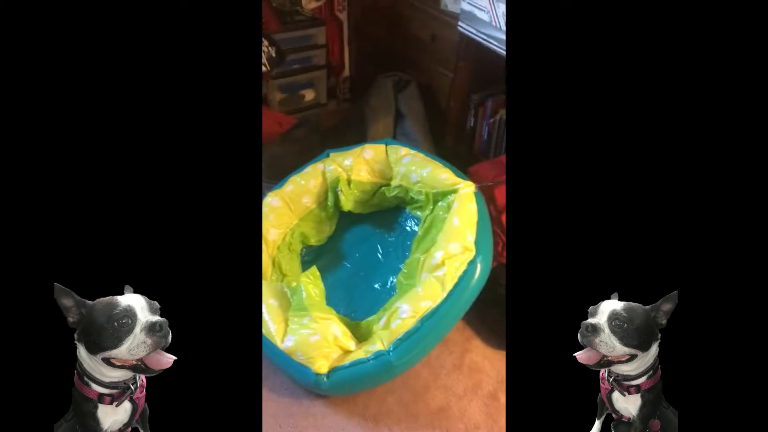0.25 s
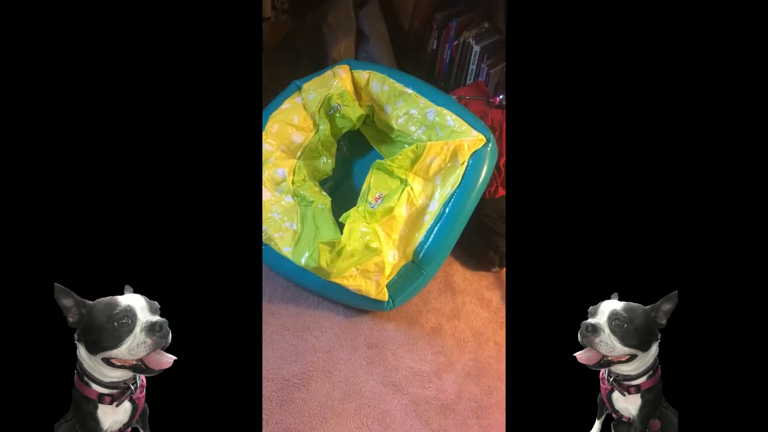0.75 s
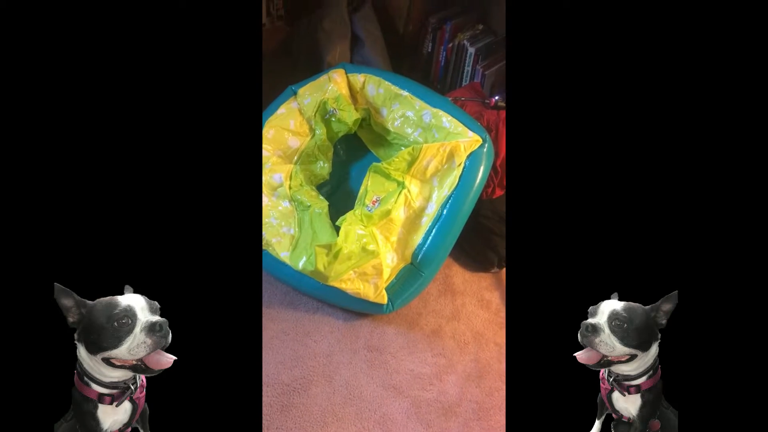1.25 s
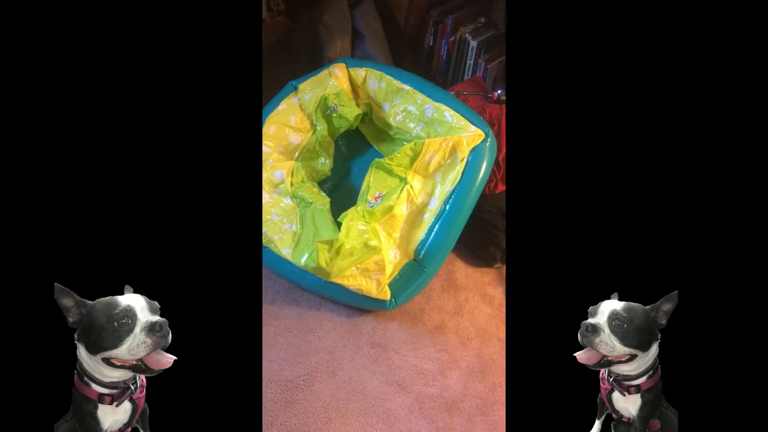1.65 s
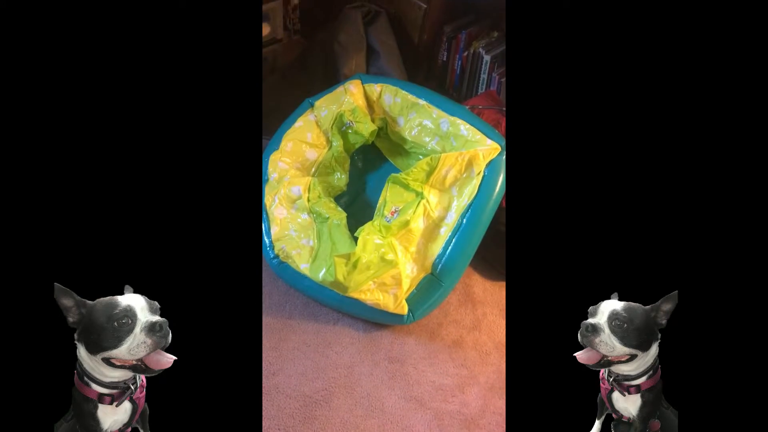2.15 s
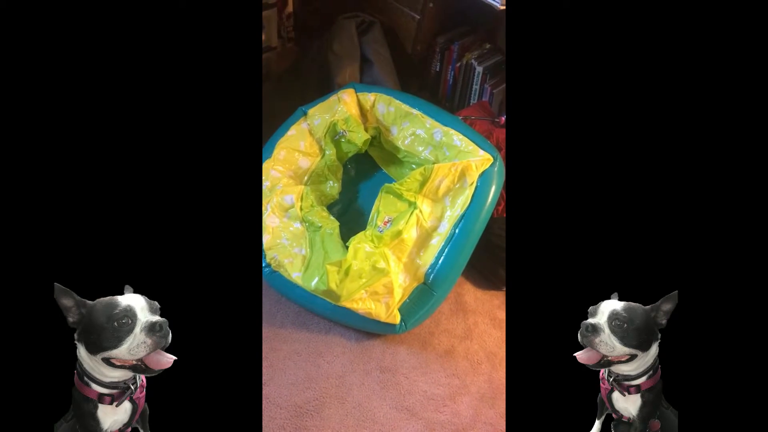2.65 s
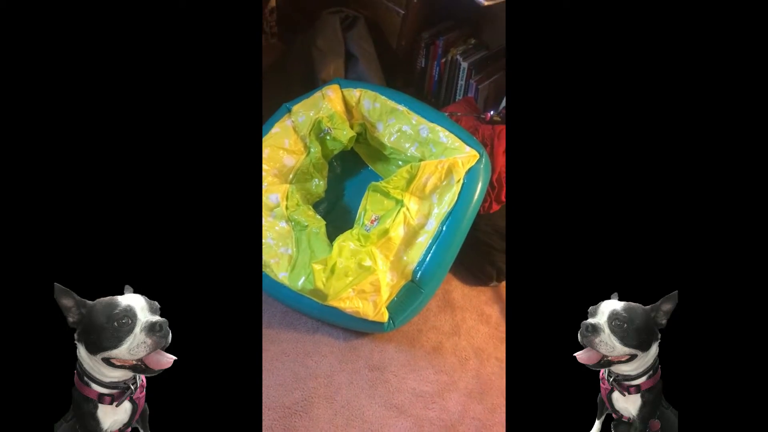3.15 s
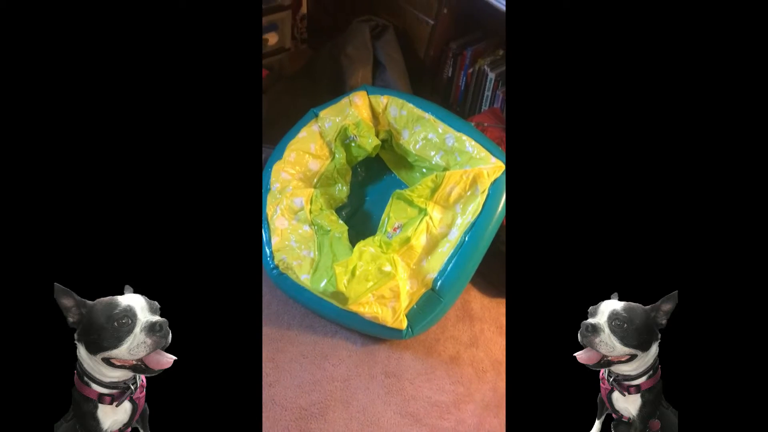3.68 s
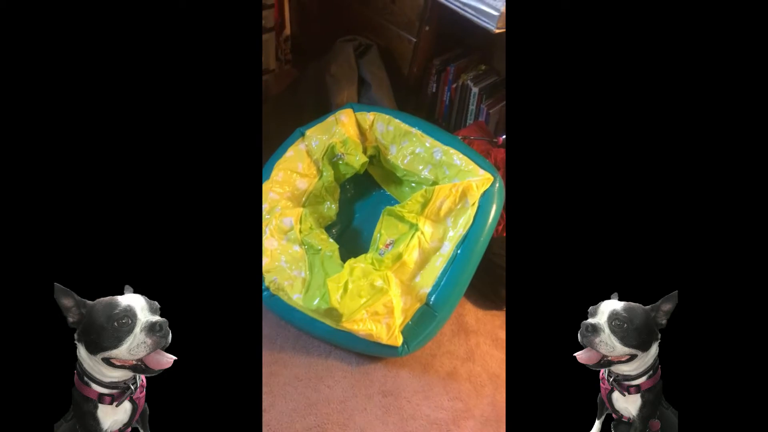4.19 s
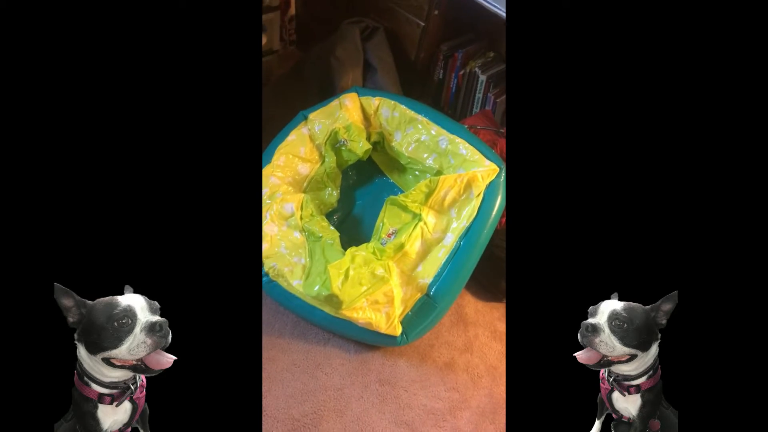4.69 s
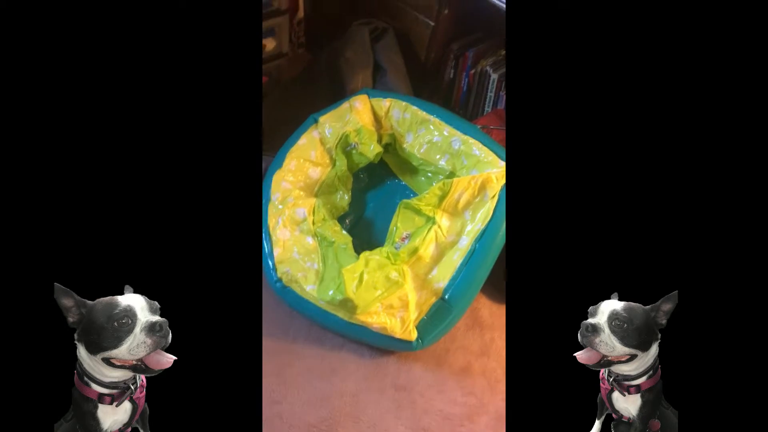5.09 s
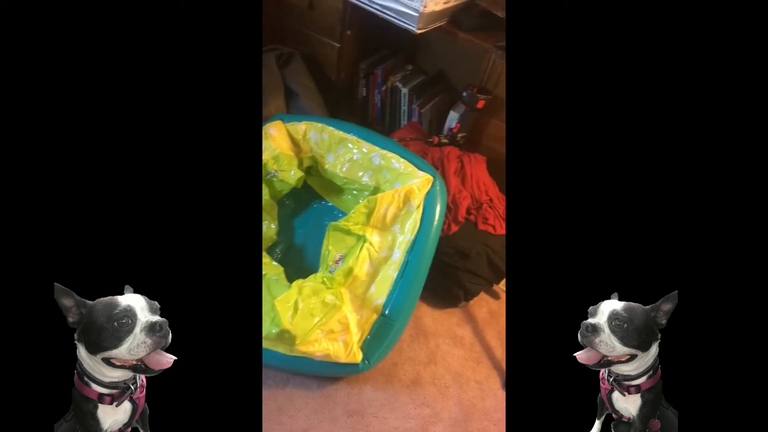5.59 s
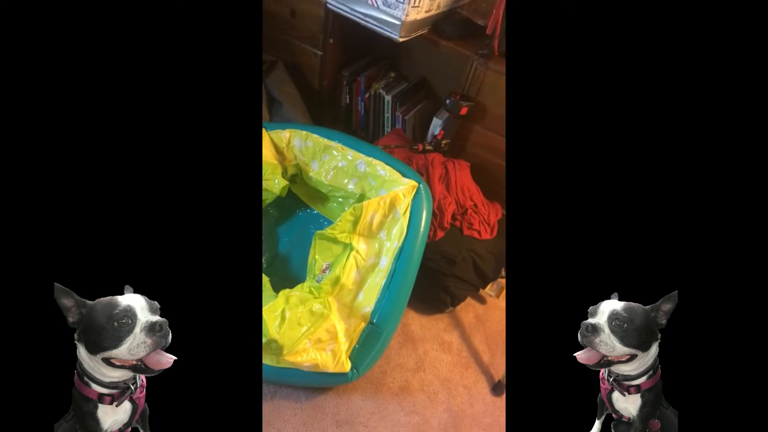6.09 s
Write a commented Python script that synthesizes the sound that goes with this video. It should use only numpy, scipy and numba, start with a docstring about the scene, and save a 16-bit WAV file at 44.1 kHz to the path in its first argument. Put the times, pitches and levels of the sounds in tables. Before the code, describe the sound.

After a fading throbbing whine and a heavy bump, a small pump rattles and hisses in a carpeted room until it shuts off and winds down.

```python
"""A carpeted room, with a small electric piston pump droning and a hand-held phone as the microphone.
First a rough whine of noise-shaken resonances dies away, and decaying modes knock the phone hard.
After a short silence the pump fades up: summed crank orders, a clatter replayed every turn and
valve hiss, until it coasts to a stop. Close on the microphone the hand rumbles as low shaped noise,
with bumps, raps and nail ticks as struck modes; faint room tone lies behind."""
import sys
import numpy as np
from scipy import signal
from scipy.fft import rfft, irfft
from scipy.io import wavfile
from scipy.ndimage import uniform_filter1d
from numba import njit

SR = 44100
rng = np.random.default_rng(int(sys.argv[2]) if len(sys.argv) > 2 else 0)


def ratio_of_db(decibels):
    """Turn decibels (scalar or array-like) into linear amplitude factors; 0 dB maps to 1."""
    return 10 ** (np.asarray(decibels, float) / 20)


def unload_wav(signal):
    """Save mono or channel-first audio to the path in sys.argv[1] as 16-bit WAV at rate SR, clipped to [-1, 1]."""
    wavfile.write(
        sys.argv[1],
        SR,
        np.round(np.clip(np.atleast_2d(signal).T, -1, 1) * 32767).astype(np.int16),
    )


N = 279373
T = np.arange(N) / SR  # time in seconds

# Crank harmonics of the pump. Each row: multiple of crank speed, level in dB.
CRANK_ORDERS = [(6, -17), (7, -12), (8, -8.5), (9, -16), (10, -3), (11, -9), (12, -4), (13, -8), (14, -3.5),
                (15, 3.5), (16, 0), (17, -0.5), (18, -11.5), (19, -1), (20, 2), (21, 3), (22, 4),
                (23, -0.5), (24, -2), (25, -2), (26, -22), (27, -4), (28, -34), (29, -16), (30, -3.5),
                (31, -25), (32, -16), (33, -11), (35, -40), (36, -6), (37, -20.5), (38, -22.5), (39, -8),
                (40, -11), (42, -21), (43, -35), (44, -41), (45, -12.5), (46, -25), (47, -37), (48, -23),
                (49, -26), (50, -26), (51, -20), (52, -37), (53, -52), (54, -20.5)]
# Wavering motor tones that sink as the pump coasts. Each row: frequency in Hz, level in dB relative to the pump.
MOTOR_TONES = [(250.6, -26.5), (3338, -30), (4183, -39), (4710, -57), (5173, -44), (6000, -42)]
# Spectrum of the loose clatter. Each row: frequency in Hz, density in dB per Hz.
CLATTER_SPECTRUM = [(120, -44), (200, -19.5), (238, -30), (419, -19), (475, -8), (525, -15), (580, -18),
                    (794, -1.5), (935, -0.5), (1190, 0), (1790, -8.5), (2360, -8), (4000, -39.5),
                    (5200, -48.5), (8800, -120)]
# Spectrum of the valve hiss. Each row: frequency in Hz, density in dB per Hz.
HISS_SPECTRUM = [(1470, -16.5), (2500, -4.5), (2890, -7.5), (3390, -5.5), (3630, -10), (4430, -17),
                 (5240, -14.5), (6390, -20), (8470, -20.5), (9720, -25), (10400, -30), (13900, -30),
                 (15500, -39)]
# Resonances of the pump housing. Each row: frequency in Hz, width in Hz, level in dB.
HOUSING_MODES = [(594, 70, -7), (840, 100, -8), (1000, 60, 0), (1180, 70, 1), (1930, 200, -10),
                 (2400, 200, -10)]
# Brief level changes of the pump, at a tap and on the last slow strokes. Each row: time in seconds, change in dB.
STROKE_SURGES = [(5.471, 4), (5.915, 3), (5.99, 8.5), (6.058, 1.5), (6.09, -2)]
# Overlapping parts of one hard knock.
# Each row: start in seconds, thud level in dB, thud frequency in Hz, case ring in dB, nail tick in dB.
KNOCK_PARTS = [(.469, -4, 116, -20.5, -49), (0.4775, 8.5, 82, -1.5, -14.5), (0.4908, -1, 69, -1, -35),
               (.501, -12, 111, -13.5, -36), (.509, -7.5, 61.8, -24, -58)]
# Soft bumps on the phone. Each row: start in seconds, level in dB, frequency in Hz, 60 dB decay in seconds.
SOFT_BUMPS = [(.636, -22.5, 93.3, .09), (1.82, -15.5, 82, 0.069), (1.897, -16, 61, 0.1),
              (2.077, -10.5, 77.4, 0.047), (2.19, -21, 110, 0.11), (2.54, -27, 109, 0.059),
              (2.931, -29, 88, .14), (3.471, -3, 91.5, 0.037), (3.647, -8.5, 87.2, 0.055),
              (3.941, -17.5, 64, 0.11), (4.272, -20, 98, 0.063), (5.1, -23, 60.7, 0.088),
              (5.288, -23, 57, .15), (5.592, -14.5, 69.6, 0.11), (5.949, -19, 63.3, 0.18),
              (5.829, -31, 70, .12), (6.068, -20.5, 70, .13), (6.16, -27, 100, 0.072),
              (6.268, -23, 59, 0.1)]
# Fingertip raps that ring the case. Each row: start in seconds, level in dB.
FINGER_RAPS = [(.444, -40), (0.547, -47), (.607, -46), (.636, -37.5), (1.249, -30), (1.482, -33),
               (1.82, -31.5), (2.54, -33), (3.62, -26.5), (3.94, -33.5), (5.466, -25.5)]
# Nail ticks. Each row: start in seconds, level in dB.
NAIL_TICKS = [(.607, -49), (.636, -42), (5.466, -12.5), (6.109, -32), (6.201, -47)]
# Modes of the phone body. Each row: frequency in Hz, level in dB, 60 dB decay in seconds.
CASE_MODES = [(333, 11, 0.0094), (444, -11.5, 0.056)]
# Modes of a nail on the case. Each row: frequency in Hz, level in dB, 60 dB decay in seconds.
NAIL_MODES = [(1010, -17, 0.025), (1680, 2.5, 0.0084), (2900, -10, 0.0066), (6200, -18, 0.0055),
              (11000, -35, .004)]
# Hand on the phone between bumps. Each row: time in seconds, rumble level in dB.
GRIP_LEVEL = [(0, -34.5), (.25, -35.5), (.43, -24), (.58, -42), (.8, -54), (1.18, -37), (1.6, -43),
              (2.4, -39.5), (3.5, -38), (4.8, -40.5), (5.4, -33), (5.74, -43), (5.97, -29), (6.12, -41),
              (6.33, -41.5)]
# Spectrum of the hand rumble. Each row: frequency in Hz, density in dB per Hz.
RUMBLE_SPECTRUM = [(12, -53), (20, -26), (48, 16), (80, 6.5), (106, 3.5), (130, -1), (245, -18.5),
                   (283, -15), (300, -37.5), (390, -38), (660, -120)]
# Dying whine, before its throb. Each row: time in seconds, level in dB.
WHINE_FALL = [(0.0, -29), (.17, -34.5), (.24, -37.5), (.29, -49.5), (.35, -63), (.44, -93)]
# Resonances of the whine. Each row: frequency in Hz, width in Hz, level in dB.
WHINE_MODES = [(607.6, 18, -1), (1226, 12, -6), (1670, 21, -28), (1850, 21, -21), (2340, 170, -66),
               (3050, 82, -20)]
# Spectrum of the air rush under the whine. Each row: frequency in Hz, density in dB per Hz.
RUSH_SPECTRUM = [(150, -69), (250, -18), (457, -26), (603, 11.5), (692, -9), (1200, -7), (1450, -19.5),
                 (2400, -19.5), (2800, -30), (3060, -33), (5000, -43), (15500, -64)]
# Spectrum of the room tone. Each row: frequency in Hz, density in dB per Hz.
ROOM_SPECTRUM = [(120, -27), (200, -17), (327, 1.5), (488, -2.5), (618, 1), (1330, -1.5), (2510, -18.5),
                 (13600, -29.5), (14700, -29), (15500, -40)]

SILENCE_START_S, SILENCE_END_S = .645, .692
OFF_S, STOP_S = 5.74, 6.246  # power cut and standstill
COAST_S = .25  # time in which the coasting crank loses 63 % of its speed
CRANK_HZ, CRANK_WANDER = 53, 0.0012085  # driven speed, and its slow wander as a share
PUMP_DB, HISS_DB, CREEP_DB_PER_S = -23, -43.5, 0.035  # at the power cut; the pump works harder as the pool fills
FADE_END_S, FADE_DB_PER_S, HISS_FADE_DB_PER_S = 1.234, 18.5, 21  # pump and hiss fade up
HOSE_HZ, HOSE_WIDTH_HZ, HOSE_GAIN_DB = 1075, 120, 8  # gain from start to power cut, as the pool pushes back


def level(x, db=0):
    """Scale a sound to an rms level in dB."""
    return x * ratio_of_db(db) / np.sqrt(np.mean(x ** 2))


def curve(table):
    """Level over time from (seconds, dB) rows, one value a sample."""
    s, db = np.transpose(table)
    return np.interp(T, s, db)


def colour(x, points):
    """Shape a spectrum by (Hz, dB) points on a log frequency axis, rms 1."""
    hz, db = np.transpose(points)
    log_hz = np.log(np.fft.rfftfreq(N, 1 / SR) + 1)
    return level(irfft(rfft(x) * ratio_of_db(np.interp(log_hz, np.log(hz), db)), N))


def walk(rate):
    """Smoothed random values, about rate a second, rms 1."""
    step = 64  # samples between points
    k = max(int(SR / rate / step), 1)
    held = np.repeat(rng.standard_normal(N // (k * step) + 2), k)
    slow = uniform_filter1d(uniform_filter1d(held, k), k)
    return level(np.interp(np.arange(N) / step, np.arange(len(slow)), slow))


def ring(hz, t60):
    """One exponentially decaying mode, .3 s long."""
    t = T[:int(.3 * SR)]
    return np.sin(2 * np.pi * hz * t) * np.exp(-np.log(1000) * t / t60)


def resonate(noise, peaks):
    """Noise through (Hz, width, dB) resonances, each applied twice for steep skirts."""
    out = 0
    for hz, width_hz, db in peaks:
        b, a = signal.iirpeak(hz, hz / (1.54 * width_hz), SR)
        once = signal.lfilter(b, a, noise)
        out = out + ratio_of_db(db) * level(signal.lfilter(b, a, once))
    return out


def add(out, s, sound):
    """Mix a sound in at time s."""
    i = int(s * SR)
    out[i:i + len(sound)] += sound


@njit
def each_turn(fresh, lag, share):
    """Every turn replays a share of the last turn and adds new chance."""
    y = np.zeros(len(fresh))
    for i in range(len(fresh)):
        back = i - lag[i]
        k = int(back)
        old = 0.
        if back > 0:
            old = y[k] + (back - k) * (y[k + 1] - y[k])
        y[i] = share[i] * old + np.sqrt(1 - share[i] ** 2) * fresh[i]
    return y


def pump():
    """Crank, clatter, hiss and motor, fading up and then coasting to a stop after the power cut."""
    speed = np.exp(-np.clip(T - OFF_S, 0, None) / COAST_S)
    hz = CRANK_HZ * (1 + CRANK_WANDER * walk(2)) * np.maximum(speed, .1)
    turn = 2 * np.pi * np.cumsum(hz) / SR
    stroke = np.cos(turn) + 0.2 * np.cos(2 * turn)
    # a slowing crank no longer repeats itself: the tones die and rough housing noise takes over
    share = speed ** 3.0

    # after the power cut the levels go as a power of the time still to run
    early_s = np.clip(FADE_END_S - T, 0, None)
    left_db = 20 * np.log10(np.clip((STOP_S - T) / (STOP_S - OFF_S), 1e-3, 1))
    surge_db = sum(db * np.exp(-((T - s) / 0.011) ** 2) for s, db in STROKE_SURGES)
    creep_db = CREEP_DB_PER_S * (T - OFF_S)
    pump_db = PUMP_DB + creep_db - FADE_DB_PER_S * early_s + 2.2 * left_db + surge_db
    hiss_db = HISS_DB - HISS_FADE_DB_PER_S * early_s + 2.6 * left_db + surge_db

    # strokes swell the clatter noise, by a smaller share when coasting
    depth = .25 * share + 0.06 * (1 - share)
    fresh = rng.standard_normal(N) * (1 + depth * stroke)
    loose = clatter(fresh, hz, share)
    driven = level(level(crank_orders(turn, hz)) + ratio_of_db(-2.0) * loose) + motor_tones(speed)
    coasting = level(loose + level(resonate(fresh, HOUSING_MODES), -1))
    body = share * driven + np.sqrt(1 - share ** 2) * coasting
    hiss = valve_hiss(stroke, hz, share, hiss_db)
    return (body * ratio_of_db(pump_db) + hiss) * (T > SILENCE_END_S)


def crank_orders(turn, hz):
    """Harmonics of the crank, partly in step, so each turn carries a knock smeared over a few ms."""
    start = 1.2 * rng.standard_normal(len(CRANK_ORDERS))
    # phase lag in rad per order squared around order 20: the knock tightens as the pool fills
    smear = np.interp(T, [SILENCE_END_S, OFF_S], (.17, .02))
    fill_db = HOSE_GAIN_DB * (T / OFF_S - .5)
    out = 0
    for (order, db), phase in zip(CRANK_ORDERS, start):
        near_hose = np.exp(-((order * hz[N // 2] - HOSE_HZ) / HOSE_WIDTH_HZ) ** 2)
        # the hand moves in the room, so each order swells and drifts alone
        order_db = db + near_hose * fill_db - 0.5 * walk(3.6)
        angle = order * turn + phase - smear * (order - 20) ** 2 + 0.27 * walk(7)
        out = out + ratio_of_db(order_db) * np.sin(angle)
    return out


def clatter(fresh, hz, share):
    """Loose parts: stroke-swelled noise, partly repeated one crank turn later."""
    return colour(each_turn(fresh, SR / hz, np.clip(.3 * share, 0, .95)), CLATTER_SPECTRUM)


def valve_hiss(stroke, hz, share, hiss_db):
    """Air through the valves: noise that swells slightly with the stroke and partly repeats each turn."""
    puff = rng.standard_normal(N) * (1 + 0.074 * stroke)
    repeated = each_turn(puff, SR / hz, np.clip(0.19 * share, 0, .95))
    return colour(repeated, HISS_SPECTRUM) * ratio_of_db(hiss_db + 0.42 * walk(13))


def motor_tones(speed):
    """Wavering motor tones whose pitch falls with the coasting speed."""
    motor_s = np.cumsum(speed) / SR
    out = 0
    for hz, db in MOTOR_TONES:
        out = out + ratio_of_db(db + 0.91 * walk(4.5)) * np.sin(2 * np.pi * hz * motor_s + .5 * walk(6.2))
    return out


def whine():
    """Narrow resonances shaken by chance, over a broad rush of air, throbbing as they die away."""
    fall_db = curve(WHINE_FALL)
    throb = np.cos(2 * np.pi * 17.2 * (T - 0.1675))  # Hz, and seconds to a peak
    whine_db = fall_db + 3 * throb
    # the treble falls faster than the whine
    treble_db = 1.17 * fall_db + 2.5 + 1.5 * throb
    tones = resonate(rng.standard_normal(N), WHINE_MODES) * ratio_of_db(1.5 * walk(40))
    rush = colour(rng.standard_normal(N), RUSH_SPECTRUM) * ratio_of_db(1.5 * walk(30))
    dull = signal.sosfilt(signal.butter(4, 1500, fs=SR, output="sos"), rush)
    bright = signal.sosfilt(signal.butter(4, 1500, "high", fs=SR, output="sos"), rush)
    rush = level(dull) * ratio_of_db(whine_db + 2.5) + level(bright) * ratio_of_db(treble_db)
    fade_out = np.clip((.5 - T) / 0.082, 0, 1)
    return (tones * ratio_of_db(whine_db) + rush) * fade_out


def struck(x, push_s):
    """A softer contact is a longer push, which rounds off the ring."""
    push = np.hanning(int(push_s * SR) + 3) ** 2
    return np.convolve(x, push / push.sum())[:len(x)]


def thumps():
    """The knock swings the phone low, rings its case and ticks; lighter touches do one or more of these."""
    thud_push_s, case_push_s, tick_push_s = 0.0068, 0.002, 0.00022
    out = np.zeros(N + SR)
    case = struck(sum(ratio_of_db(db) * ring(hz, t60) for hz, db, t60 in CASE_MODES), case_push_s)
    tick = struck(sum(ratio_of_db(db) * ring(hz, t60) for hz, db, t60 in NAIL_MODES), tick_push_s)
    for s, db, hz, case_db, tick_db in KNOCK_PARTS:
        thud = struck(ring(hz, 5.5 / hz), thud_push_s)  # 5.5 swings until 60 dB down
        add(out, s, ratio_of_db(db) * thud + ratio_of_db(case_db) * case + ratio_of_db(tick_db) * tick)
    for s, db, hz, t60 in SOFT_BUMPS:
        add(out, s, ratio_of_db(db) * struck(ring(hz, t60), thud_push_s))
    for s, db in FINGER_RAPS:
        add(out, s, ratio_of_db(db) * case)
    for s, db in NAIL_TICKS:
        add(out, s, ratio_of_db(db) * tick)
    return out[:N]


def hand():
    """Skin and grip shifting on the phone: a lumpy low rumble that swells after each soft bump."""
    lumps_db = 2.5 * walk(18)
    shifts = 0
    for s, db, hz, t60 in SOFT_BUMPS:
        since = np.clip(T - s, 0, None) / 0.024  # the grip's swell tops after 24 ms
        shifts = shifts + ratio_of_db(db - 19) * since * np.exp(1 - since)
    rumble = colour(rng.standard_normal(N), RUMBLE_SPECTRUM)
    return rumble * (ratio_of_db(curve(GRIP_LEVEL)) + shifts) * ratio_of_db(lumps_db)


def room_tone():
    """Steady, faint noise of the room behind everything."""
    return colour(rng.standard_normal(N), ROOM_SPECTRUM) * ratio_of_db(-57.5)


def scene():
    """All sources in the room, as one channel."""
    return (pump() + whine() + thumps() + hand() + room_tone())[None]


def band_limit(x):
    """A steep low-pass at the top of the band."""
    return signal.sosfilt(signal.butter(12, 15630, fs=SR, output="sos"), x)


def record(dry):
    """The microphone drops the deepest bass and softly clips the hardest knock; a silence parts the sound."""
    heard = signal.sosfilt(signal.butter(3, 57.2, "high", fs=SR, output="sos"), dry)
    clipped = 1.02 * heard / (1 + heard ** 4) ** (1 / 4)
    sounding = (T < SILENCE_START_S) | (T > SILENCE_END_S)
    return band_limit(clipped * sounding)


dry = scene()
out = record(dry)
unload_wav(out)
```